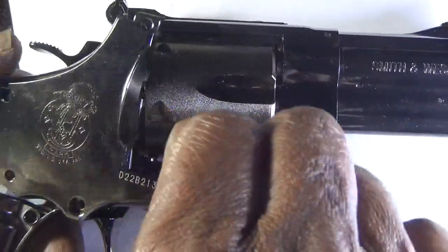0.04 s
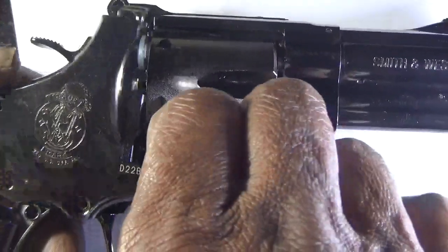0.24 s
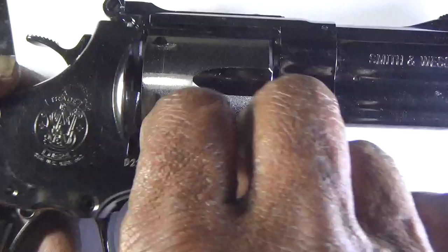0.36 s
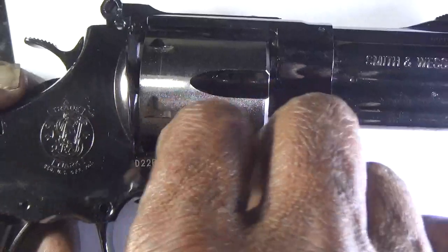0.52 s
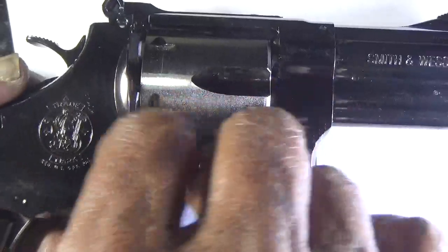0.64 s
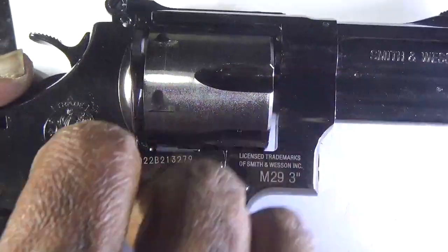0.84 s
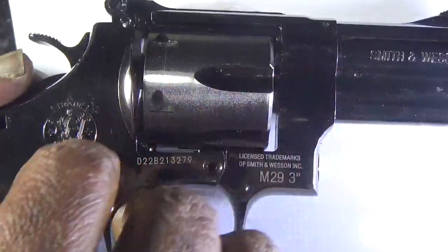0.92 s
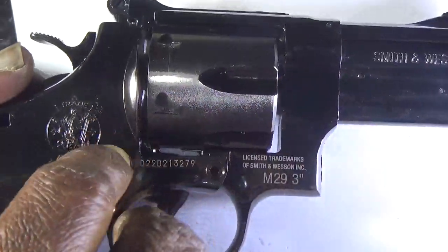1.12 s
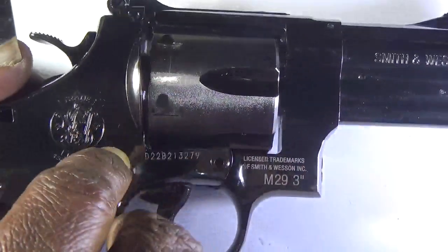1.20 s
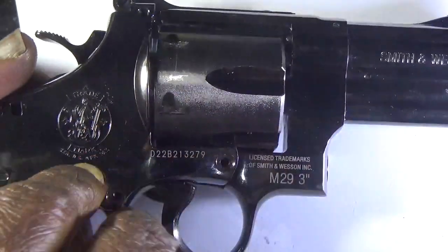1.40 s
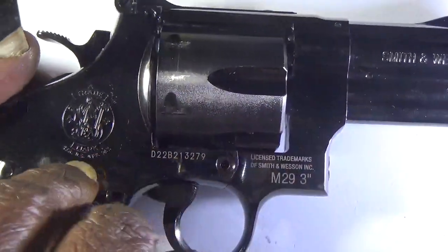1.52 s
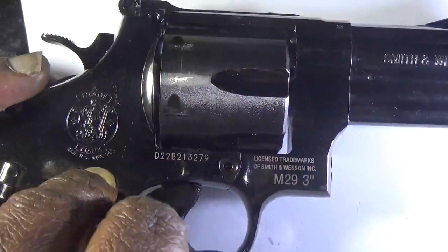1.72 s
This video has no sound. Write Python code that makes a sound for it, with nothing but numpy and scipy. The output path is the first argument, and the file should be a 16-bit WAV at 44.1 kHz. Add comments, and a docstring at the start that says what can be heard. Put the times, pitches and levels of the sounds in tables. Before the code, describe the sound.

A steel air revolver is handled close up in a small room. Light clicks begin at once, thickening into a bright, ringing rattle around 0.35-0.44 s with rubbing fingers. Sparser clicks lead to a hard snap at 0.72 s. After a near-quiet gap with faint ticks, a clicking cluster snaps at 1.19 s, then crisp clacks and a dull bump at 1.42-1.48 s over soft steady background noise.

```python
"""Steel air revolver handled

A steel air revolver is handled close to the microphone in a small room, among clicks and hard snaps.
Each click is a hit and a chatter of tiny contacts: shaped noise plus ringing cylinder, lockwork, frame.
Knocks and snaps are single decaying sines; the loose cylinder also sings on faintly.
Rubbing fingers, dull bumps and the steady background are filtered noise; the room is a diffuse tail."""
import sys
import numpy as np
from scipy import signal
from scipy.fft import rfft, irfft
from scipy.io import wavfile

SR = 44100
rng = np.random.default_rng(int(sys.argv[2]) if len(sys.argv) > 2 else 0)


def bounce(signal):
    """Save signal as a 16-bit WAV file at the path given by the first command-line argument."""
    frames = np.transpose(np.atleast_2d(signal))
    limited = np.clip(frames, -1, 1)
    pcm = np.round(limited * 32767).astype(np.int16)
    wavfile.write(sys.argv[1], SR, pcm)


N = 77175

# cylinder modes: f/Hz, level/dB, t60/s
CYLINDER_MODES = [(1620, -11, .06), (2904, -13, .07), (3664, -7, .07), (3702, -2.5, .085), (3765, -8, .06),
                  (4289, -5.5, .08), (4370, -6, .05), (5438, -7, .07), (6179, -5, .085), (6690, -11, .07),
                  (7910, -8, .04), (8384, -10, .05), (10023, -16, .1)]
GUN_WIDTH, HUSH_WIDTH = 0.23, 0.29  # opposed part / shared part
BASS_ROLLOFF_HZ = 150  # small steel parts radiate little bass


def scene():
    """Sums the gun, slightly to the left, its room, the hands and the background."""
    gun = knocks() + snaps() + clicks()
    highpass = signal.butter(2, BASS_ROLLOFF_HZ, "high", fs=SR, output="sos")
    gun = signal.sosfilt(highpass, gun + free_ring(gun))
    pan_db = 1  # left over right
    panned = gun * amp([[pan_db / 2], [-pan_db / 2]])
    return panned + room(gun) + hands() + hush()


def clicks():
    """Metal parts meet at many points, each favouring a different mode."""
    # t/s, chatter length/s, level/dB in each of five bands, cylinder ring/dB, lockwork ring/dB,
    # favoured f/Hz
    click_table = [(0.001, 0.0042, -41.5, -44, -41.5, -57, -37, -18, 6, 8710),
                   (0.0281, 0.00079, -39, -40, -42, -61, -48, -5, -11, 2904),
                   (0.119, 0.0051, -46.5, -43.5, -44.5, -59, -64, -2, 0, 3720),
                   (0.141, 0.0082, -40.5, -39, -36.5, -45, -38, -9, -5, 8710),
                   (0.155, 0.001, -67, -52, -44, -65, -44, -17, -15, 8710),
                   (0.1847, 0.0021, -48.5, -42.5, -40, -62, -48, -12, 7, 4289),
                   (0.217, 0.0026, -36.5, -34.5, -32, -51, -40.5, -16, -21, 3765),
                   (0.228, 0.0044, -37, -33, -34.5, -31.5, -28, -7, -7, 8600),
                   (0.2484, 0.0024, -46.5, -32, -27.5, -45, -40, -14, -4, 4289),
                   (0.255, 0.0043, -42.5, -40, -48, -41, -36.5, -26, -19, 8385),
                   (0.323, 0.0062, -39.5, -33, -27, -44, -38, -2, 6.5, 4289),
                   (0.329, 0.01, -40, -35.5, -22.5, -28.5, -40, 4, -26, 4385),
                   (0.3494, 0.0075, -48.5, -29, -25, -19.5, -22, 2.5, 2.5, 7910),
                   (0.366, 0.015, -40, -35, -27, -30.5, -27, 9.5, -5, 8385),
                   (0.3802, 0.014, -43, -25.5, -16.5, -18, -26, 10.5, -12, 6180),
                   (0.4004, 0.012, -48, -26, -17, -18, -22.5, 2, -13, 3702),
                   (0.42, 0.0022, -49, -34, -59, -18, -29.5, -15, -7, 6675),
                   (0.4367, 0.0026, -44.5, -26, -25.5, -24.5, -29.5, -4, -1, 3765),
                   (0.487, 0.002, -38.5, -34, -32, -38, -42, -24, -12, 2480),
                   (0.4971, 0.0015, -62, -37, -37.5, -30.5, -46, -1, -5, 3765),
                   (0.6153, 0.0048, -55, -44, -30.5, -43, -46, 12, 3, 3765),
                   (0.621, 0.0019, -38.5, -36, -34.5, -37, -47, -0.5, -10, 3765),
                   (0.6492, 0.0018, -42.5, -39.5, -37, -43, -56, -1, -2, 3765),
                   (0.7087, 0.0032, -39, -28.5, -27.5, -37, -46, 4, -10, 3702),
                   (0.723, 0.00076, -37.5, -19, -33.5, -27, -42, -9, -10.5, 1705),
                   (0.7257, 0.0071, -40.5, -29, -29, -24.5, -32, -12, -4.5, 6670),
                   (0.741, 0.0011, -46.5, -33, -39.5, -44, -46, -11, -19, 2480),
                   (0.929, 0.0018, -55, -50, -48, -68, -71, 10, -4, 3830),
                   (0.95, 0.009, -47.5, -44, -46.5, -57.5, -52, 2, 0, 3765),
                   (1.14, 0.0034, -44, -51, -47.5, -66, -53.5, -12, 7, 3712),
                   (1.16, 0.013, -50, -41, -41.5, -41, -56, 5, -10, 3702),
                   (1.173, 0.016, -44, -41.5, -31.5, -46, -45, 0, -12, 3702),
                   (1.1893, 0.0058, -34.5, -29, -30.5, -25, -34, -11, -5, 5363),
                   (1.197, 0.0049, -46, -39, -32.5, -30.5, -62, -5, -1, 6235),
                   (1.283, 0.0013, -55, -44.5, -53.5, -49.5, -65, -9, -5, 1705),
                   (1.4225, 0.0025, -40, -34, -31, -20, -27, 0, 5, 10022),
                   (1.4505, 0.0034, -46.5, -41, -43, -49, -42, -3, -6, 4385),
                   (1.47, 0.0013, -42.5, -38, -26.5, -41, -35, 17.5, 0, 3765),
                   (1.482, 0.0067, -36, -33.5, -23.5, -25.5, -33.5, -16.5, 1, 3765)]
    out = np.zeros((2, N))
    for start, length, *band_db, cylinder_db, lockwork_db, favoured_hz in click_table:
        add(out, start, click(length, band_db, cylinder_db, lockwork_db, favoured_hz))
    return out


def click(length, band_db, cylinder_db, lockwork_db, favoured_hz, size=12288):
    """One hit and a chatter of tiny contacts: a dry clack plus the ring of cylinder, lockwork and frame."""
    # lockwork modes: f/Hz, level/dB, t60/s
    lockwork_modes = [(1640, 1, 0.03), (1706, -4.5, 0.064), (2386, -11.5, 0.07), (2915, -8.5, 0.15),
                      (3710, -11, 0.075), (4380, -14, .028), (5487, 3, 0.019), (5567, 0, 0.025),
                      (6235, 1, 0.039), (6660, 1, 0.058), (8000, -26, 0.1), (8650, 0, 0.06),
                      (10022, -6, 0.22)]
    # frame modes: f/Hz, level/dB, t60/s
    frame_modes = [(464, 0, 0.057), (529, -1.5, 0.041), (799, -3.5, 0.047), (1047, -7, 0.095)]
    frame_db, attack_s = -4, 0.00017
    t = np.arange(size) / SR
    drive = chatter(t, length)
    body = clack(t, drive)
    for modes, db in ((CYLINDER_MODES, cylinder_db), (lockwork_modes, lockwork_db), (frame_modes, frame_db)):
        body = body + amp(db) * ring(drive, modes, favoured_hz)
    body = body * (1 - np.exp(-t / attack_s))
    return spread(set_bands(body, band_db), GUN_WIDTH)


def chatter(t, length):
    """Random contact impulses after a first hit; long contacts scrape, so their first hit is weaker."""
    first_hit, contacts_per_s, fade_s, scrape_s = 3.85, 4500, .0009, 0.0087
    hold = np.exp(-np.maximum(t - length, 0) / fade_s)
    contacts = rng.random(len(t)) < contacts_per_s / SR
    drive = rng.standard_normal(len(t)) * contacts * hold
    drive[0] = first_hit * np.exp(-length / scrape_s)
    return drive


def clack(t, drive):
    """Dry noise burst: each contact adds energy that decays quickly."""
    # clack colour: f/Hz, level/dB
    clack_colour = [(60, -57), (180, -20), (300, 6.5), (450, 5.5), (640, -2.5), (1000, 2), (1300, -5),
                    (1700, -1.5), (2500, 2), (3400, 0.5), (4400, 0.5), (5500, 3.5), (5900, -8), (6750, 7),
                    (7400, -3.5), (8600, 6), (9500, -2), (10400, -4), (11200, -9.5)]
    clack_t60_s, clack_db = 0.029, 0.5
    decay = amp(-60 * t / clack_t60_s)
    energy = abs(signal.fftconvolve(drive ** 2, decay ** 2)[:len(t)])
    grains = rng.standard_normal((2, len(t))) * np.sqrt(energy)
    return amp(clack_db) * np.sqrt(2) * unit(colour(grains, clack_colour))


def ring(drive, modes, favoured_hz):
    """Drives a set of decaying modes; the point of contact favours one of them."""
    detune = .0015  # share by which grip and contact shift each mode per call
    spread_db, favour_db, favour_width_hz = -0.14, 8.5, 48
    t = np.arange(len(drive)) / SR
    out = np.zeros((2, len(t)))
    for hz, db, t60 in modes:
        mode_hz = hz * (1 + detune * rng.standard_normal())
        mode = np.cos(2 * np.pi * (mode_hz * t + rng.random())) * amp(-60 * t / t60)
        favour = favour_db / (1 + ((hz - favoured_hz) / favour_width_hz) ** 2)
        level_db = db + favour + spread_db * rng.standard_normal()
        signs = np.array([[1], [rng.choice([-1, 1])]])
        out += amp(level_db) * signs * unit(signal.fftconvolve(drive, mode)[:len(t)])
    return out / np.linalg.norm(amp([m[1] for m in modes]))


def set_bands(body, band_db):
    """Tilts the spectrum towards the band levels, with a weaker bass."""
    # edges of the five bands: f/Hz
    edges_hz = [300, 1200, 3200, 5000, 7500, 11500]
    bass_rolloff_db = -5.5
    size = body.shape[1]
    hz = np.fft.rfftfreq(size, 1 / SR)
    power = abs(rfft(body[0])) ** 2 * 2 / size / (.01 * SR)  # energy referred to 10 ms
    tilt = []
    for lo, hi, db in zip(edges_hz, edges_hz[1:], band_db):
        band_power = power[(hz >= lo) & (hz < hi)].sum()
        tilt.append((np.sqrt(lo * hi), db - 10 * np.log10(band_power)))
    bass = (BASS_ROLLOFF_HZ, tilt[0][1] + bass_rolloff_db)
    return colour(body, [bass] + tilt)


def snaps():
    """A sprung part of latch or lockwork slams onto its stop and rings briefly at its own pitch."""
    # t/s, f/Hz, level/dB, t60/s
    snap_table = [(.2308, 3460, -18.5, 0.02), (.2492, 4110, -19.5, 0.02), (.7218, 2150, -7.5, 0.006),
                  (.7266, 4484, -11.5, 0.028), (1.1892, 1770, -9.5, 0.0076), (1.1893, 4330, -21, 0.022),
                  (1.4228, 4590, -16, .018), (1.4228, 6594, -15.5, 0.038), (1.4495, 4470, -30, 0.035),
                  (1.4834, 1654, -18, 0.035), (1.4809, 2915, -20, 0.053), (1.4832, 9900, -16, 0.03),
                  (1.483, 10860, -15.5, 0.017)]
    rise_s = 0.00016
    out = np.zeros((2, N))
    for start, hz, db, t60 in snap_table:
        add(out, start, amp(db) * struck(hz, rise_s, t60))
    return out


def knocks():
    """Soft contacts of cylinder against frame wake only a low resonance of the frame."""
    # t/s, f/Hz, level/dB
    knock_table = [(.217, 494, -30), (.23, 788, -42), (.25, 557, -33), (0.619, 472, -40),
                   (.652, 493, -37.5), (1.154, 457, -31.5), (1.18, 448, -33), (1.466, 233, -37)]
    rise_s, t60_s = 0.0015, 0.073
    out = np.zeros((2, N))
    for start, hz, db in knock_table:
        add(out, start, amp(db) * struck(hz, rise_s, t60_s))
    return out


def struck(hz, rise, t60):
    """One resonance that swells and dies away."""
    t = np.arange(0, t60, 1 / SR)
    envelope = (1 - np.exp(-t / rise)) ** 2 * amp(-60 * t / t60)
    return (envelope * np.sin(2 * np.pi * hz * t))[None]


def free_ring(gun):
    """Contacts made before the latch time set the loose cylinder singing with a long decay."""
    latch_s, t60_s, ring_db = .72, 0.88, -1.5
    loose = np.arange(N) < latch_s * SR
    modes = [(hz, db, t60_s) for hz, db, _ in CYLINDER_MODES]
    return amp(ring_db) * spread(ring(gun[0] * loose, modes, 0), GUN_WIDTH)


def hands():
    """Skin rubs over the steel, and the grip bumps dully."""
    # rub level: t/s, level/dB
    rub_level = [(0, -38), (.04, -46.5), (.12, -48.5), (.2, -48.5), (.29, -43.5), (.45, -35.5), (.58, -47),
                 (.68, -42), (.8, -51), (.86, -49), (.9, -52), (.93, -52.5), (1.0, -56), (1.6, -54.5),
                 (1.75, -58)]
    # rub colour: f/Hz, level/dB per Hz
    rub_colour = [(100, -21), (190, -9), (300, 2.5), (550, -3.5), (800, 1), (1600, -0.5), (2500, -5.5),
                  (3700, -4.5), (5000, -6.5), (8600, -9.5), (11000, -15)]
    # bump level: t/s, level/dB
    bump_level = [(0, -68.5), (.05, -74), (.095, -51.5), (.2, -60), (.254, -54), (.29, -63), (.38, -66.5),
                  (.68, -75.5), (.735, -55.5), (.95, -76), (.99, -84), (1.25, -91), (1.41, -74),
                  (1.452, -45.5), (1.5, -52), (1.58, -64), (1.62, -62), (1.75, -60)]
    # bump colour: f/Hz, level/dB per Hz
    bump_colour = [(20, -21), (45, -6.5), (75, 5.5), (120, 3), (175, -2.5), (300, -15), (600, -42),
                   (1500, -70)]
    t = np.arange(N) / SR
    rub_gain = amp(np.interp(t, *np.transpose(rub_level)))
    bump_gain = amp(np.interp(t, *np.transpose(bump_level)))
    rub = rub_gain * noise(rub_colour, HUSH_WIDTH, grain_db=2.5)
    return rub + bump_gain * noise(bump_colour, width=0.34)


def room(x):
    """A diffuse tail, strongest in the low middle, whose decay time varies with frequency."""
    # room decay: f/Hz, t60/s
    room_t60 = [(150, 0.5), (500, 0.21), (1400, 0.23), (3500, 0.76), (6500, 0.63), (10000, 0.2)]
    # room level: f/Hz, level/dB
    room_level = [(100, -17), (240, 13.5), (450, -15), (760, 3), (1050, -2), (1700, -15.5), (3500, -25.5),
                  (6500, -18.5), (10000, -28.5)]
    delay_s, room_width = .006, 0.39
    hz, t, z = signal.stft(rng.standard_normal((2, SR)), SR, nperseg=256)
    t60 = read(room_t60, hz)[:, None]
    decay = amp(read(room_level, hz)[:, None] - 60 * t / t60)
    z = z * decay * np.sqrt(2 * np.log(1000) / (t60 * SR))  # tail energy independent of t60
    tail = spread(signal.istft(z, SR, nperseg=256)[1], room_width)
    out = np.zeros((2, N))
    add(out, delay_s, signal.fftconvolve(x.mean(0)[None], tail, axes=1))
    return out


def hush():
    """Steady background of coloured noise."""
    # background colour: f/Hz, level/dB per Hz
    hush_colour = [(25, -33), (100, -36), (190, -9), (290, -5), (800, -1.5), (1100, -1), (1600, -2),
                   (2700, -10.5), (3600, -18), (5000, -32), (11000, -25)]
    hush_db = -52.5
    return amp(hush_db) * noise(hush_colour, HUSH_WIDTH)


def noise(spectrum, width, grain_db=0):
    """Coloured stereo noise of rms 1, grainy if asked."""
    grain_gain = amp(grain_db * np.minimum(rng.exponential(1, N), 5))
    grains = rng.standard_normal((2, N)) * grain_gain
    shaped = irfft(rfft(grains) * amp(read(spectrum, np.fft.rfftfreq(N, 1 / SR))), N)
    return unit(spread(shaped, width)) * np.sqrt(2 * N)


def amp(db):
    """Decibels to gain."""
    return 10 ** (np.asarray(db) / 20)


def unit(x):
    """Scales to energy 1."""
    return x / np.sqrt(np.sum(x ** 2) + 1e-20)


def read(points, hz):
    """Reads a table on a log-frequency axis."""
    f, value = np.transpose(points)
    return np.interp(np.log(hz + 1), np.log(f + 1), value)


def add(mix, s, sound):
    """Mixes a sound in at time s."""
    part = mix[:, max(0, round(s * SR)):][:, :sound.shape[1]]
    part += sound[:, :part.shape[1]]


def colour(x, points, size=2048):
    """Causal minimum-phase filter with the given (Hz, dB) curve."""
    log_gain = np.log(amp(read(points, abs(np.fft.fftfreq(size, 1 / SR)))))
    taps = np.fft.ifft(np.exp(np.conj(signal.hilbert(log_gain)))).real[:size // 2]
    return signal.fftconvolve(x, taps[None], axes=1)[:, :x.shape[1]]


def spread(pair, width):
    """Left and right from a shared part and a weaker opposed part."""
    return np.array([pair[0] + width * pair[1], pair[0] - width * pair[1]])


def record(dry):
    """The recorder's band limit: a linear-phase low-pass."""
    edge_hz = 11080
    lowpass = signal.firwin(301, edge_hz, window=("kaiser", 8), fs=SR)
    return signal.oaconvolve(dry, lowpass[None], "same")


dry = scene()
out = record(dry)
bounce(out)
```